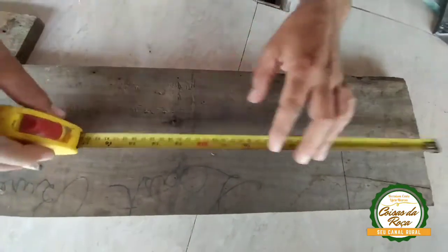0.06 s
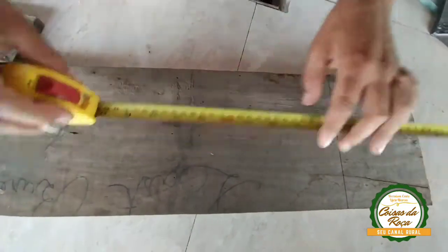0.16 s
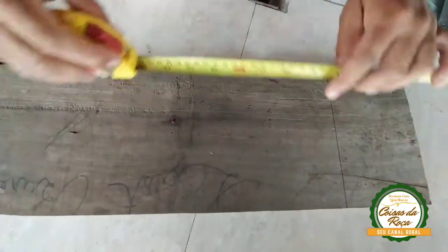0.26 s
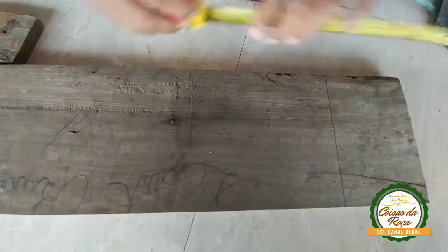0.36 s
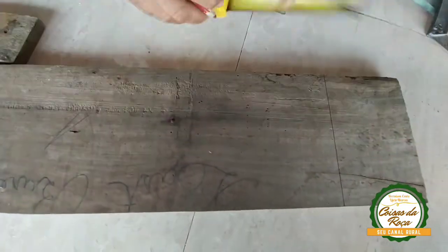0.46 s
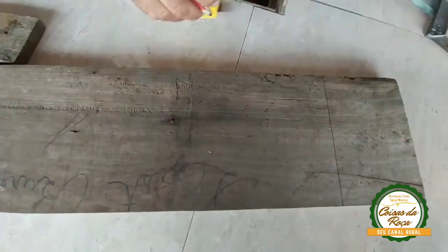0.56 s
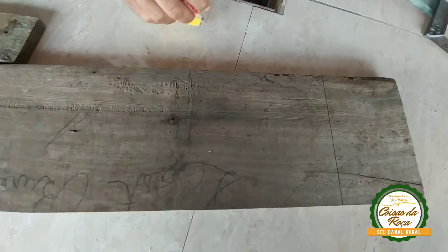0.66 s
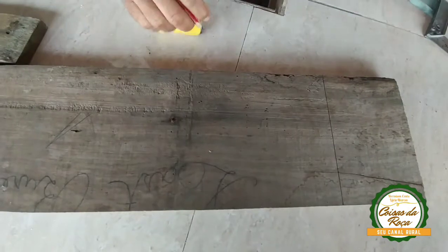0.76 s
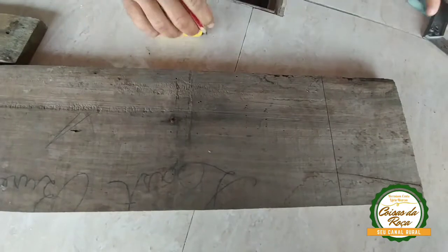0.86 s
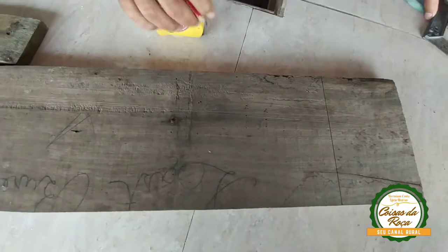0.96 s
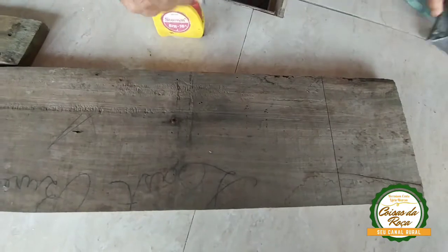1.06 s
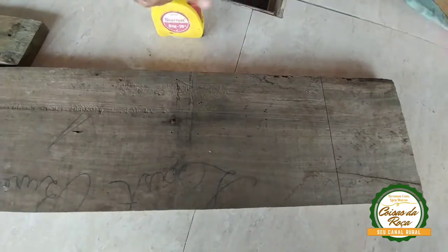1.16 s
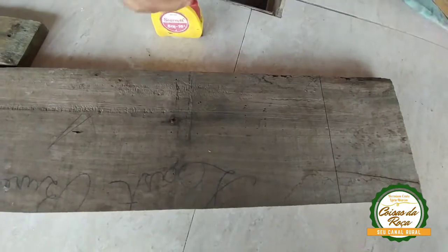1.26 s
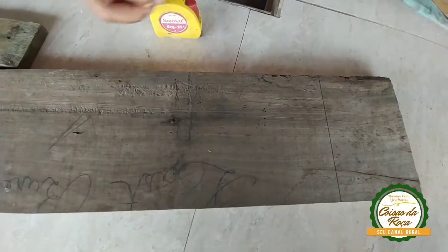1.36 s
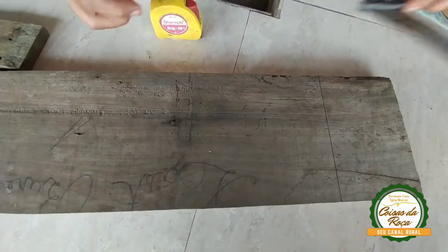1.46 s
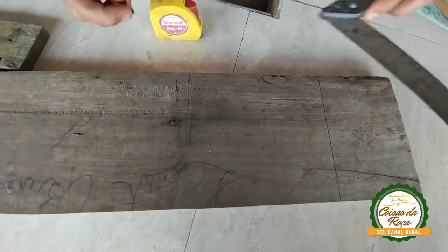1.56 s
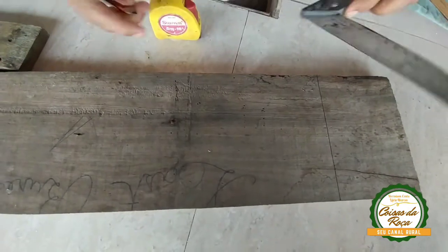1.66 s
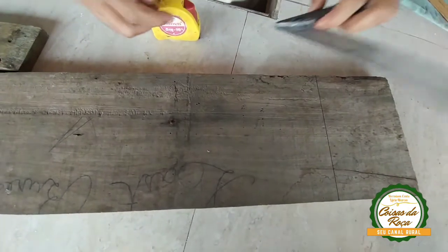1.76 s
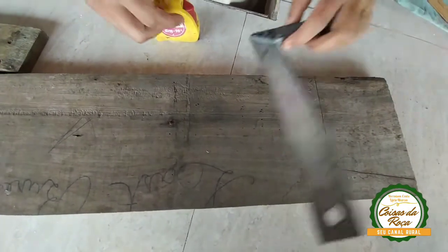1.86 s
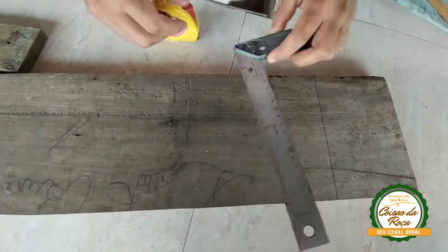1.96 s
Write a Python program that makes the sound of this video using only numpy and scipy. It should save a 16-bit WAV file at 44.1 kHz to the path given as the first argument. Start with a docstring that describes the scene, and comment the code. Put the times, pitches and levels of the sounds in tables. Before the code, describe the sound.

A steel tape measure retracts close up: thin metallic slaps, a fast bright whir and a sharp snap, then the case clacks onto floor tiles, followed by a faint steel scrape on a quiet porch.

```python
"""On a quiet porch, close to the microphone, a steel tape measure clacks and whirs back into its case.
The loose blade is bursts of noise with a thin high ring; its run through the slot is dense tiny ticks,
with sliding resonances, a floor echo and a droning reel. The hook snaps home, then the case touches the
tiles, lands and rocks: short noise cracks, some ringing case modes. A steel square scrapes the tiles as
ticks through high modes. Soft thuds, porch echoes, air, a far whistling trill and a low hum lie behind."""
import sys
import numpy as np
from scipy import signal
from scipy.fft import rfft, irfft
from scipy.io import wavfile
from scipy.ndimage import map_coordinates

SR = 44100
rng = np.random.default_rng(int(sys.argv[2]) if len(sys.argv) > 2 else 0)


def pcm_store(signal):
    """Save signal as 16-bit PCM."""
    levels = np.round(np.clip(np.atleast_2d(signal), -1, 1) * 32767)
    wavfile.write(sys.argv[1], SR, levels.astype(np.int16).T)


N = 88200
TIME = np.arange(N) / SR
BLADE_LIKENESS = 0.059  # share of the blade's noise power common to both microphone ports
CASE_RISE_S = 0.0011  # onset of the case modes
TOP_HZ = 15750  # upper end of the pickup

# the blade running through the slot: start_s, level_db, left_minus_right_db
BLADE_RUN = [(.325, -40, 16), (.35, -24, -4), (.40, -26.5, -4), (.44, -24, -2.5), (.52, -26, -2),
             (.59, -25.5, -2.5), (.65, -28, -3), (.716, -29.5, -9)]
# modes of the case held in the hand: pitch_hz, level_db, t60_s
HELD_CASE_MODES = [(481, -23, 0.023), (540, -25, 0.027), (812, -17, 0.025), (1526, -23.5, 0.037),
                   (2390, -25.5, 0.083), (2830, -23, .035)]


def amp(db):
    """Decibels to an amplitude factor."""
    return 10 ** (np.asarray(db) / 20)


def curve(rows, column=1):
    """A column of a table joined by straight lines in time."""
    rows = np.array(rows)
    return np.interp(TIME, rows[:, 0], rows[:, column])


def pan(x, db):
    """Lean a sound to the left by db, half on each port."""
    return x * amp(np.array([[.5], [-.5]]) * db)


def convolve(x, response):
    """Pass each port through a response, cut to the length of the scene."""
    return signal.fftconvolve(np.atleast_2d(x), np.atleast_2d(response), axes=1)[:, :N]


def colour(x, points, size=4096):
    """Causal filter through (pitch_hz, level_db) points; it keeps white noise power, so only shape counts."""
    hz, db = np.array(points).T
    gain = amp(np.interp(np.log(np.fft.rfftfreq(size, 1 / SR) + 1), np.log(hz), db))
    # folding the cepstrum gives minimum phase: nothing sounds ahead of the hit
    cepstrum = irfft(np.log(gain))
    cepstrum[1:size // 2] *= 2
    cepstrum[size // 2 + 1:] = 0
    response = irfft(np.exp(rfft(cepstrum)))
    return convolve(x, response / np.linalg.norm(response))


def noise(likeness):
    """White noise at two microphone ports, partly shared."""
    shared = np.clip(likeness, 0, 1)
    draws = rng.standard_normal((3, N))
    return np.sqrt(shared) * draws[2] + np.sqrt(1 - shared) * draws[:2]


def waver(rate_hz, likeness=1):
    """Smooth chance at the two ports, spread 1."""
    lowpass = np.exp(-.5 * (np.fft.rfftfreq(N, 1 / SR) / rate_hz) ** 2)
    x = irfft(rfft(noise(likeness)) * lowpass, N)
    return x / x.std()


def tone(hz):
    """A sine of rms 1 that follows a moving pitch."""
    return np.sqrt(2) * np.sin(2 * np.pi * np.cumsum(hz) / SR)


def contact(start, fall_s, rise_s=0.00025):
    """Envelope of a contact: quick rise, exponential fall."""
    age = np.maximum(TIME - start, 0)
    return (1 - np.exp(-age / rise_s)) * np.exp(-age / fall_s)


def cracks(hits, fall_s, points, likeness):
    """The noisy part of a group of hard contacts, their powers added."""
    power = sum((amp(db) * contact(start, fall_s)) ** 2 for start, db in hits)
    return colour(noise(likeness) * np.sqrt(power), points)


def ring(modes, start=0, rise_s=1 / SR):
    """Decaying modes set going at one moment."""
    age = np.maximum(TIME - start, 0)
    onset = 1 - np.exp(-(age / rise_s) ** 2)
    ringing = 0
    for hz, db, t60 in modes:
        decay = np.exp(-np.log(1000) * age / t60)
        ringing = ringing + amp(db) * np.sin(2 * np.pi * hz * age) * decay
    return onset * ringing


def friction(likeness, tick_s=0.00011, ticks_per_s=2900, tick_spread_db=2):
    """Rubbing as dense tiny ticks of uneven size that die away over tick_s, rms 1."""
    chance = rng.random(N) < ticks_per_s / SR
    tick_power = chance * amp(tick_spread_db * rng.standard_normal(N)) ** 2
    power = signal.lfilter([1], [1, -np.exp(-1 / (tick_s * SR))], tick_power)
    return noise(likeness) * np.sqrt(power / power.mean())


def blade_ring(x, ring_db, count=70):
    """The thin steel strip adds many close, high modes, with their own phases at each port."""
    low_hz, high_hz, t60_s = 7990, 11860, 0.37
    age = TIME[:N // 4]
    draws = rng.random((count, 3))
    pitches = low_hz + (high_hz - low_hz) * draws[:, 0]
    modes = 0
    for hz, turn in zip(pitches, draws[:, 1:]):
        modes = modes + np.sin(2 * np.pi * (hz * age + turn[:, None]))
    modes = modes * np.exp(-np.log(1000) * age / t60_s)
    share = (high_hz - low_hz) / (SR / 2)  # part of the spectrum that the modes fill
    return x + amp(ring_db) * convolve(x, modes * np.sqrt(share) / np.linalg.norm(modes[0]))


def blade_clacks():
    """The loose blade buckles and slaps; the fingers damp its ring, so it is faint."""
    # slaps of the loose blade: start_s, level_db, fall_s, left_minus_right_db
    slaps = [(0.1398, -36.5, 0.0061, -22.5), (0.153, -34, 0.022, -7), (0.2117, -20.5, 0.0051, -14),
             (0.217, -11.5, 0.0051, -6.5), (0.2205, -18, 0.0016, -22), (0.233, -25, 0.0062, -12),
             (0.2546, -18.5, 0.0054, -3), (0.266, -21, 0.006, -11), (0.272, -14.5, 0.0047, -4),
             (.318, -12, 0.0081, -7.5), (0.3308, -6, 0.0018, -1), (0.4704, -16.5, 0.0056, -4),
             (0.508, -15.5, 0.0049, -3), (0.536, -18, 0.0058, -6), (0.673, -18.5, 0.0024, -10),
             (0.6914, -20, 0.0044, -9), (0.703, -15, 0.0033, -4)]
    # colour of a slap: pitch_hz, level_db
    slap_colour = [(300, -36), (1200, -25), (2400, -23), (3200, -15.5), (4500, -18), (6000, -17),
                   (8000, -8), (9500, 3), (11000, -9), (12300, -26), (15500, -29)]
    power = sum(pan(amp(db) * contact(start, fall), lean) ** 2 for start, db, fall, lean in slaps)
    slapping = colour(np.sqrt(power) * noise(BLADE_LIKENESS), slap_colour)
    return blade_ring(slapping, ring_db=-27)


def band_flicker(x, count=36):
    """Narrow bands of the rubbing swell and fade by chance, each on its own."""
    flicker_hz, flicker_db = 18, 3.2
    hz, spectrum = np.fft.rfftfreq(N, 1 / SR), rfft(x)
    centres = np.linspace(0, TOP_HZ, count)
    gains = amp(flicker_db * np.array([waver(flicker_hz)[0] for _ in centres]))
    gains = gains / np.sqrt(np.mean(gains ** 2))
    flickering = 0
    for gain, band in zip(gains, np.eye(count)):
        flickering = flickering + gain * irfft(spectrum * np.interp(hz, centres, band), N)
    return flickering


def floor_bounce(x):
    """The floor mirrors the blade; the lag shrinks as the case is lowered, so the comb bands drift."""
    bounce_db, far_lag_s, near_lag_s = -10.5, 0.001394, 0.00069
    lag = np.interp(TIME, [BLADE_RUN[0][0], BLADE_RUN[-1][0]], [far_lag_s, near_lag_s])
    mirrored = np.array([map_coordinates(port, [(TIME - lag) * SR]) for port in x])
    return x + amp(bounce_db) * mirrored


def blade_run():
    """The blade rubs through the slot, fluttering with the reel; its resonances slide and flicker."""
    # colour of the rubbing: pitch_hz, level_db
    rub_colour = [(300, -31.5), (1200, -31.5), (2000, -15.5), (3000, -13.5), (4400, -15), (6500, -9),
                  (9100, 0.5), (11000, -4), (12800, -12), (15500, -22)]
    # resonances that slide as the blade shortens: start_pitch_hz, end_pitch_hz, width_hz, level_db
    glides = [(2484, 3400, 51, -25.5), (9900, 6700, 48, -11)]
    fade_s, reel_hz, flutter_db = 0.012, 67, 0.6
    start, end = BLADE_RUN[0][0], BLADE_RUN[-1][0]
    fade_in = np.clip((TIME - start) / fade_s, 0, 1)
    fade_out = np.clip((end - TIME) / fade_s + 1, 0, 1)
    # uneven turning: the phase drifts by chance
    turns = np.cumsum(reel_hz * (1 + 6 * rng.standard_normal(N))) / SR
    force = fade_in * fade_out * amp(curve(BLADE_RUN) + flutter_db * np.sin(2 * np.pi * turns))
    rub = band_flicker(colour(friction(BLADE_LIKENESS), rub_colour))
    zing = 0
    for first_hz, last_hz, width_hz, db in glides:
        pitch = np.interp(TIME, [start, end], [first_hz, last_hz])
        zing = zing + amp(db) * waver(width_hz, BLADE_LIKENESS) * tone(pitch)
    return floor_bounce(pan(force * (rub + zing), curve(BLADE_RUN, column=2)))


def reel():
    """The spinning reel rumbles in the case, which drones at a wandering pitch as it spins and coasts."""
    # course of the drone, its level shared by the rumble: start_s, pitch_hz, level_db
    spin = [(.46, 640, -76), (.555, 577, -46), (.62, 573, -58.5), (.70, 628, -50), (.76, 563, -71),
            (.87, 540, -75)]
    # colour of the rumble: pitch_hz, level_db
    rumble_colour = [(200, -15.5), (780, -9), (1400, -9.5), (3000, -32)]
    spinning = (TIME > spin[0][0]) & (TIME < spin[-1][0])
    drone = waver(rate_hz=37) * tone(curve(spin))
    rumble = colour(friction(0.76), rumble_colour)
    return spinning * amp(curve(spin, column=2)) * (rumble + drone)


def hook_snap():
    """The hook hits the mouth of the case and bounces, ringing the case in the hand."""
    # hits of the hook: start_s, level_db
    hits = [(0.7159, -4.5), (.7188, -9)]
    # colour of the snap: pitch_hz, level_db
    snap_colour = [(300, -18), (600, -8.5), (1200, -10), (1800, -11.5), (2800, -2), (4200, -10.5),
                   (5050, 2.5), (5800, -12), (6800, -5), (9400, 5), (12300, -22)]
    crack = cracks(hits, 0.0025, snap_colour, 0.32)
    return pan(crack + ring(HELD_CASE_MODES, hits[-1][0], CASE_RISE_S), -3)


def case_touch():
    """An edge of the case touches the tiles and the hook jingles: bright noise cracks."""
    # touches of the edge: start_s, level_db
    hits = [(.8497, -18.5), (.8538, -19)]
    # colour of touch and jingle: pitch_hz, level_db
    touch_colour = [(600, -23), (1300, -4.5), (1700, -9), (2400, 4.5), (3200, -7), (6200, -11),
                    (8200, -1.5), (10000, 5.5), (12000, -10), (15500, -16)]
    return pan(cracks(hits, 0.01, touch_colour, 0.095), -6)


def case_landing():
    """The base of the case lands flat and the standing case rings, hollow between thump and clack."""
    # knocks of the base: start_s, level_db
    hits = [(.9098, -12), (.9112, -13)]
    # colour of the knock: pitch_hz, level_db
    knock_colour = [(270, -9), (460, -16), (620, -34), (760, 5.5), (1150, 3.5), (1640, -4), (1850, 4.5),
                    (4300, -11.5), (6300, -6.5), (10300, -5.5), (12000, -23.5)]
    # modes of the case standing on the floor: pitch_hz, level_db, t60_s
    standing_modes = [(187.7, -32.5, 0.16), (233, -17.5, 0.029), (787, -16, 0.04), (942, -14, 0.041),
                      (1121, 0.5, 0.014), (1233, -4, 0.017), (1850, -8.5, 0.016)]
    hollow_hz, hollow_width_hz = 555, 380
    knock = cracks(hits, 0.0031, knock_colour, 0.084)
    knock = knock + ring(standing_modes, hits[-1][0], CASE_RISE_S)
    notch = signal.iirnotch(hollow_hz, hollow_hz / hollow_width_hz, fs=SR)
    return pan(signal.lfilter(*notch, knock), -3.5)


def case_rocking():
    """The case rocks as the hand lets go: faint cracks, each ringing the case modes."""
    # contacts of the rocking base: start_s, level_db
    hits = [(1.1256, -31.5), (1.1325, -29), (1.1382, -29.5), (1.145, -43.5), (1.151, -37.5)]
    # colour of the rocking: pitch_hz, level_db
    rock_colour = [(200, -13), (520, -4.5), (1300, -0.5), (2000, 4.5), (2550, -3.5), (3100, -9.5),
                   (6000, -25), (11000, -16), (15500, -31)]
    ring_db = 11.5  # lift of the modes over each contact's level
    rock = cracks(hits, 0.0084, rock_colour, 0.12)
    for start, db in hits:
        rock = rock + amp(db + ring_db) * ring(HELD_CASE_MODES, start, CASE_RISE_S)
    return pan(rock, -3.5)


def case():
    """All contacts of the case; the left port hears them a little later."""
    left_lag_s = .00016
    left, right = hook_snap() + case_touch() + case_landing() + case_rocking()
    return np.array([map_coordinates(left, [(TIME - left_lag_s) * SR]), right])


def square():
    """A steel square scrapes off the tiles: its edge catches on grit and its high modes ring."""
    # course of the scrape: start_s, level_db
    slide = [(1.135, -62), (1.15, -39), (1.179, -48), (1.183, -34), (1.212, -33.5), (1.28, -58.5)]
    # colour of scrape and catches: pitch_hz, level_db
    scrape_colour = [(500, -15.5), (1400, -14.5), (2100, -2), (3000, -9.5), (4300, -3.5), (6000, -8.5),
                     (8200, -7), (9800, 3), (11300, 1), (13200, -10), (15500, -33)]
    # catches of the edge on grit: start_s, level_db
    catches = [(1.181, -33.5), (1.1935, -29)]
    # modes of the steel square: pitch_hz, level_db, t60_s
    square_modes = [(4280, -50, .11), (9455, -45, .1), (10100, -50, .14), (10850, -46, .15),
                    (11900, -50, .12)]
    sliding = (TIME > slide[0][0]) & (TIME < slide[-1][0])
    scrape = colour(friction(0.086, tick_s=0.0009) * sliding * amp(curve(slide)), scrape_colour)
    scrape = scrape + cracks(catches, 0.0028, scrape_colour, 0.12)
    return scrape + convolve(scrape, ring(square_modes))


def handling():
    """Soft thuds of handling and moved air: dull noise in bell-shaped swells."""
    # thuds: centre_s, level_db, spread_s, left_minus_right_db
    thuds = [(0.162, -46.5, 0.037, 7.5), (0.664, -46.5, 0.021, -24.5), (0.692, -38, 0.0078, -22.5),
             (0.97, -46.5, 0.071, 1.5), (1.127, -52, 0.024, -14), (1.691, -47, 0.016, -13.5)]
    # colour of the thuds: pitch_hz, level_db
    thud_colour = [(20, 1), (65, -4), (200, -7.5), (350, -20), (2000, -66)]
    swells = 0
    for centre, db, spread, lean in thuds:
        bell = np.exp(-.5 * ((TIME - centre) / spread) ** 2)
        swells = swells + pan(amp(db) * bell, lean)
    return colour(noise(0.6), thud_colour) * swells


def porch(x):
    """Diffuse echoes from floor, walls and roof: noise with a level and decay for each band."""
    # echoes by band: pitch_hz, level_db, t60_s
    bands = [(170, -14, 0.78), (507, -8.5, 0.39), (1140, -18.5, 0.38), (3900, -9, 0.29), (11000, -17, 0.4)]
    delay_s = 0.0062
    log_hz = np.log(np.fft.rfftfreq(N, 1 / SR) + 1)
    centres = np.log([row[0] for row in bands])
    spectrum, response = rfft(noise(0.1)), 0
    for weights, (_, db, t60) in zip(np.eye(len(bands)), bands):
        decay = contact(delay_s, t60 / np.log(1000))
        band = irfft(spectrum * np.interp(log_hz, centres, weights), N)
        response = response + amp(db) * band * decay / np.linalg.norm(decay)
    return convolve(x.sum(axis=0) / np.sqrt(2), response)


def far_trill():
    """A far whistle that lifts in pitch as it swells, with quick chance wobbles of pitch and level."""
    # course of the whistle: start_s, pitch_hz, level_db
    whistle = [(1.3, 2256, -65), (1.39, 2317, -56.5), (1.54, 2210, -64), (1.73, 2365, -58.5),
               (1.87, 2273, -74.5), (1.98, 2310, -63.5)]
    wobble_hz, wobble_rate_hz, flicker_db = 48.8, 69.3, 3
    pitch = curve(whistle) + wobble_hz * waver(wobble_rate_hz)[0]
    level_db = curve(whistle, column=2) + flicker_db * waver(wobble_rate_hz, 0.95)
    return pan(tone(pitch) * amp(level_db), -10)


def outdoor_air():
    """Quiet air: coloured noise that slowly sinks, nearly separate at the two ports."""
    # colour of the air: pitch_hz, level_db
    air_colour = [(20, 10.5), (120, -2.5), (800, -8), (1130, -7), (1500, -11), (2250, -4.5), (2900, -7),
                  (7000, -15), (10800, -13), (12500, -28.5), (15500, -34)]
    # course of the air: start_s, level_db
    air_level = [(0, -45.5), (1.1, -49.5), (1.5, -53), (2, -53.5)]
    return pan(colour(noise(0.1), air_colour) * amp(curve(air_level)), -1.5)


def low_hum():
    """A low sine whose phase drifts a little by chance."""
    # course of the hum: start_s, level_db
    hum_level = [(0, -62.5), (.8, -64), (1.45, -65.5), (1.62, -65.5)]
    hum_hz = 82.3
    return amp(curve(hum_level)) * tone(hum_hz * (1 + 2 * rng.standard_normal(N)))


def scene():
    """The tape measure and square with their porch echoes, over handling and the quiet outdoors."""
    clacks = blade_clacks()
    # the coiled blade rings along with its own run and the knocks of the case
    others = blade_ring(blade_run() + case(), ring_db=-11) + reel() + square()
    echoes = porch(others + amp(-2.5) * clacks)
    return clacks + others + echoes + handling() + outdoor_air() + far_trill() + low_hum()


def record(dry):
    """The left port is brighter at the very top; peaks are rounded and all above the top is cut."""
    treble_hz, treble_db, peak_ceiling = 10600, 6.5, .85
    hz = np.fft.rfftfreq(N, 1 / SR)
    lean = treble_db * (1 + np.tanh((hz - treble_hz) / 800)) / 2
    ports = irfft(pan(rfft(dry), lean), N)
    ports = peak_ceiling * np.tanh(ports / peak_ceiling)
    return signal.sosfilt(signal.ellip(10, .2, 70, TOP_HZ, fs=SR, output="sos"), ports)


dry = scene()
out = record(dry)
pcm_store(out)
```